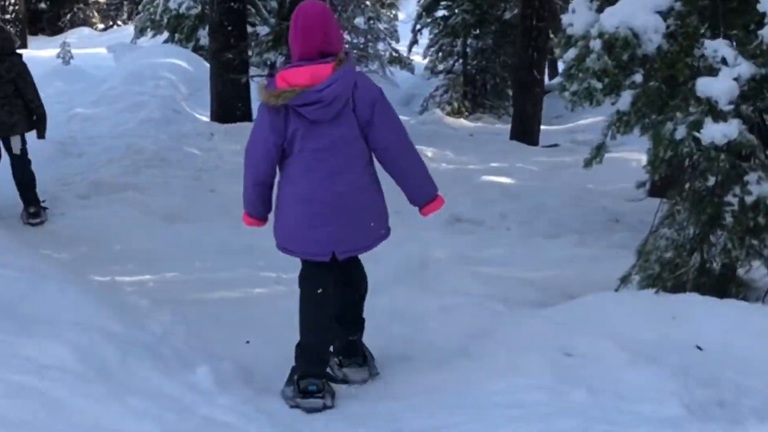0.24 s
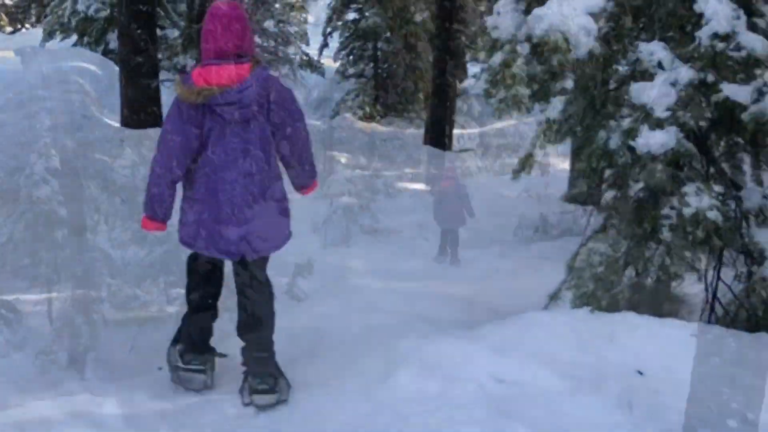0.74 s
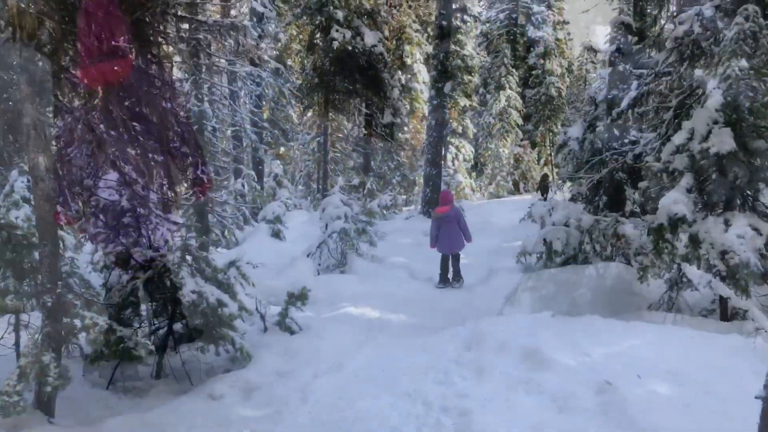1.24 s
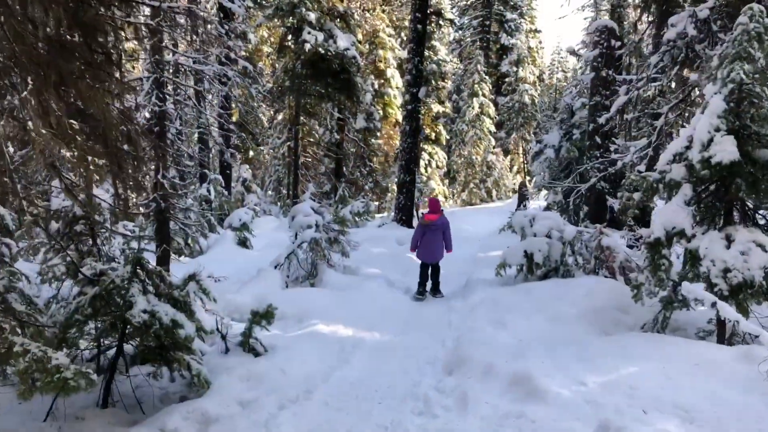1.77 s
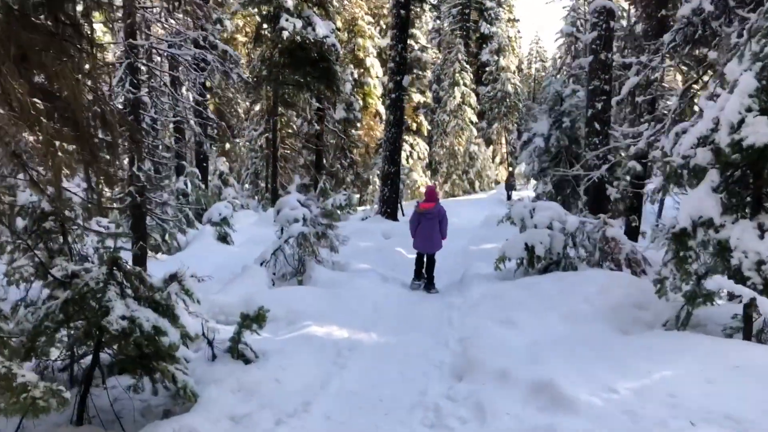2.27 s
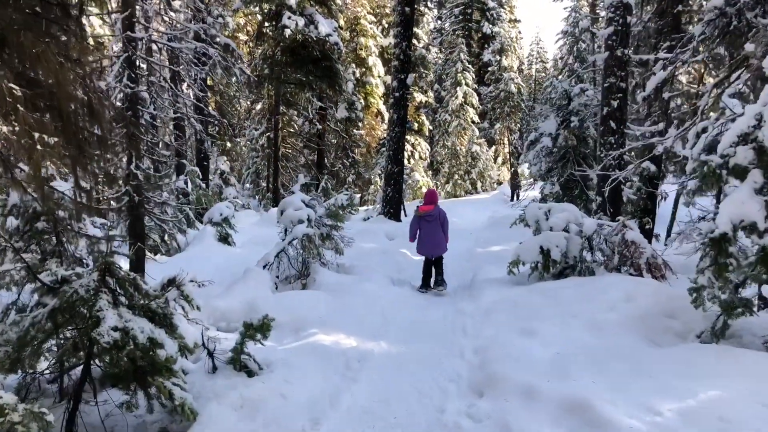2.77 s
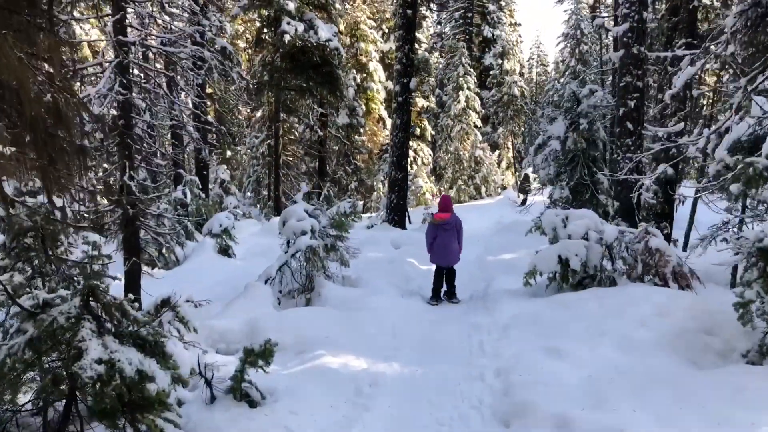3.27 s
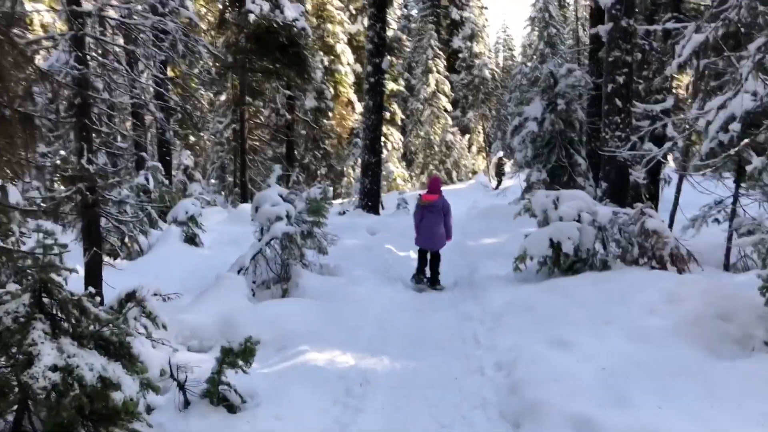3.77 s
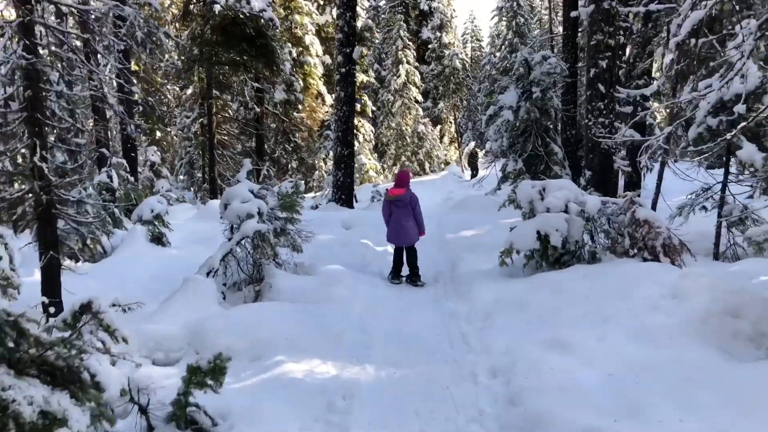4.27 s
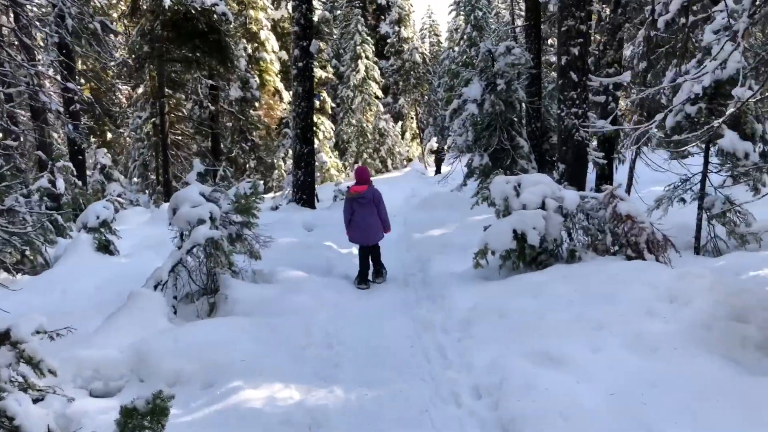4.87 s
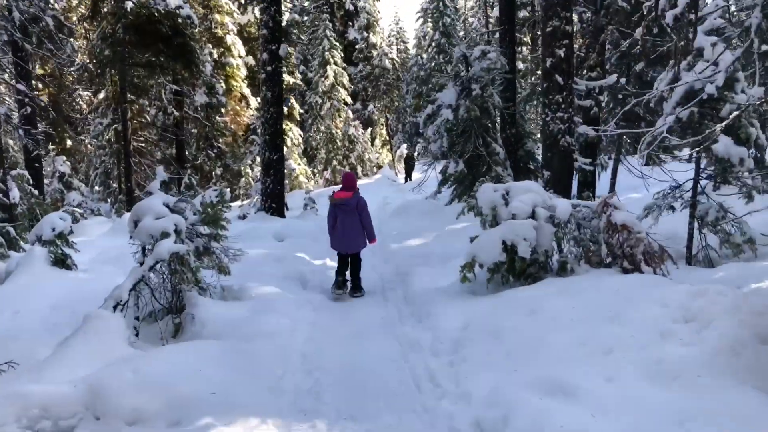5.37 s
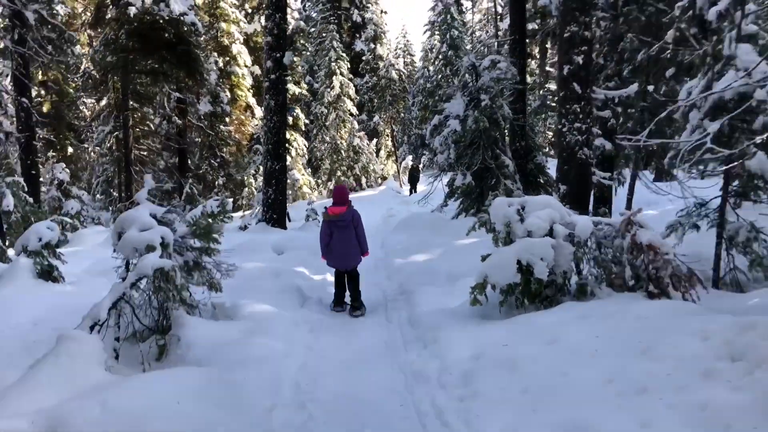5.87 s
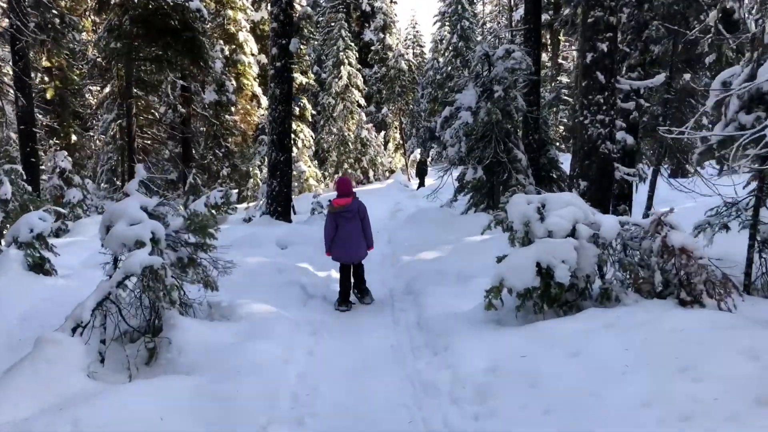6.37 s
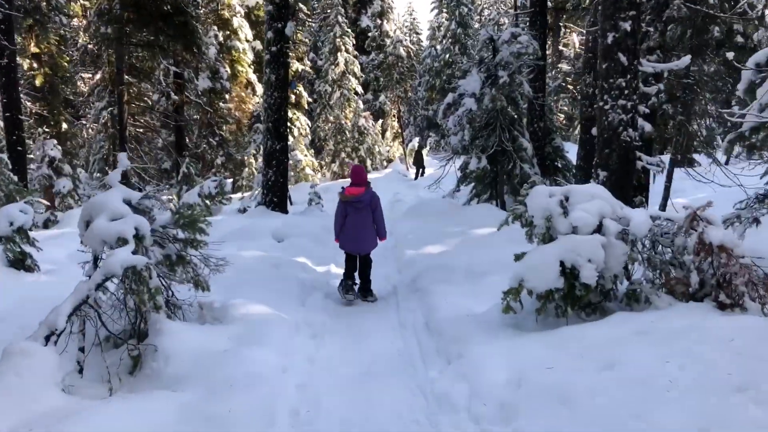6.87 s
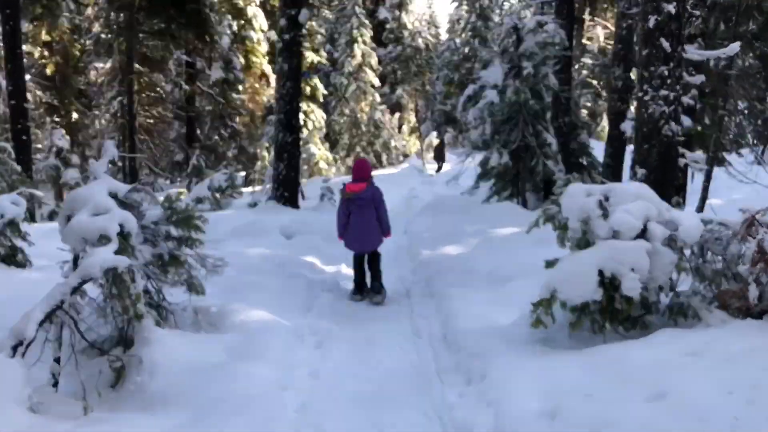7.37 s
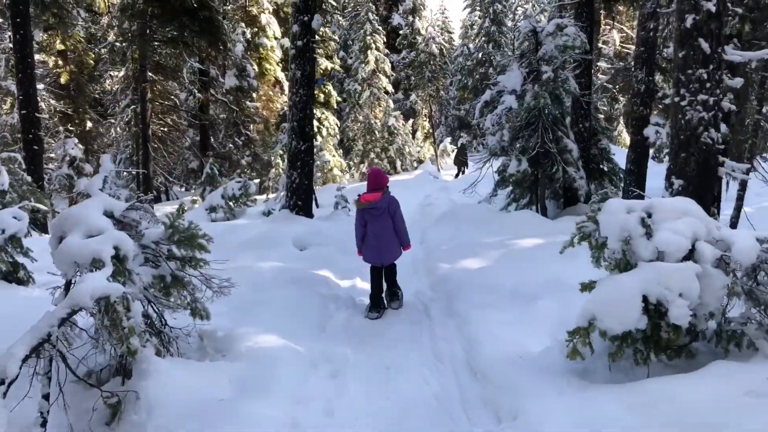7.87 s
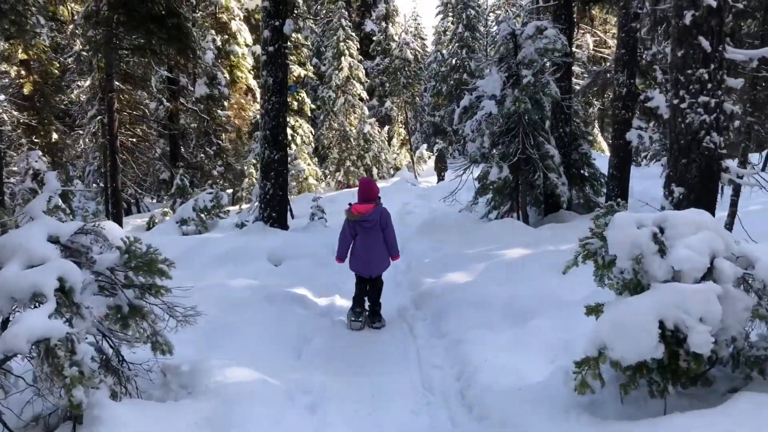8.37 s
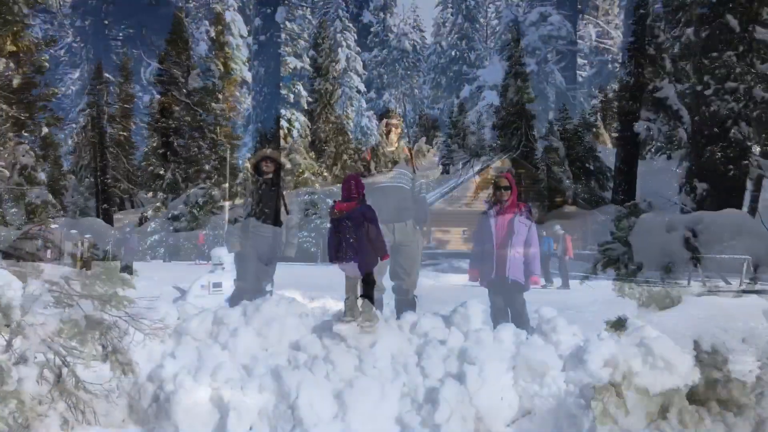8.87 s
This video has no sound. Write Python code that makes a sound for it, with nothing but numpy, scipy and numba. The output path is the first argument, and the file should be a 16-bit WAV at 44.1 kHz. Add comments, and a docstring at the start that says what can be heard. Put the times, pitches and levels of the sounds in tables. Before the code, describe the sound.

A quiet snowy forest with a soft, dull hush of air. At 0-0.3 s powder snow hisses and a light scrape and a bright crust tick sound, with jacket rustle fairly near. The first crunch comes at 0.35 s, then steps at about 1.2, 1.9, 2.6, 3.4, 4.1, 4.9, 5.6, 6.4, 7.1, 7.8 and 8.5 s. Each is a grainy, creaking crunch under load, followed some 0.15 s later by a usually deeper, rounder crunch as the foot rolls, then soft settling. Between them the frame scuffs and cleats tap with tiny hollow knocks. Sharper crust snaps stand out near 2.9, 3.9, 5.1 and 6.5 s. Steps are fullest from 2.6 to 6.5 s and lighter toward the end; rustle recedes after 1.5 s. After 8.7 s only small scuffs and hush remain. Close, dry mono pickup at chest height, with faint short tree reflections.

```python
"""First a hiss of loose snow and a light scrape, then a walker in snowshoes on packed snow, a quiet forest trail.
The microphone is at chest height. Each step is a short scuff of the frame, a long crunch as the weight
comes on, and a deeper one as the foot rolls. The crust snaps now and then; the trees return a faint tail.
Snow and crust are runs of tiny shaped clicks under force envelopes; snaps, knocks and deck are decaying sines.
Cloth is a dense run of such clicks, the still air is coloured noise, and the echoes are sparse random taps."""
import sys
import numpy as np
from scipy import signal
from scipy.fft import rfft, irfft, next_fast_len
from scipy.io import wavfile
from scipy.ndimage import uniform_filter1d
from numba import njit

SR = 44100
rng = np.random.default_rng(int(sys.argv[2]) if len(sys.argv) > 2 else 0)


def int16_out(signal):
    """Quantize to a 16-bit WAV file."""
    q = np.round(np.clip(np.atleast_2d(signal).T, -1, 1) * 32767)
    wavfile.write(sys.argv[1], SR, q.astype(np.int16))


N = 403074
TIME = np.arange(N) / SR
THUD_HZ, FIZZ_HZ = 550, 3100  # the crunch lies between these, the thud below, the fizz above
EDGE_HZ = 16300  # upper band limit of the recorder


def gain_of(db):
    """Decibels to an amplitude factor."""
    return 10 ** (np.asarray(db) / 20)


def evened(x):
    """Scales to rms 1."""
    return x / np.sqrt(np.mean(x ** 2) + 1e-20)


def read(points, hz):
    """Joins (f/Hz, value) points on a log-frequency axis."""
    f, value = np.transpose(points)
    return np.interp(np.log(hz + 1), np.log(f + 1), value)


def add(mix, s, sound):
    """Mixes a sound in at time s, in seconds."""
    part = mix[max(round(s * SR), 0):][:len(sound)]
    part += sound[:len(part)]


def swell(t, hold, rise, fall):
    """Grows exponentially towards time zero, holds, and dies away; all times in seconds."""
    return np.exp(np.minimum(t, 0) / rise - np.maximum(t - hold, 0) / fall)


def click(colour, lumps_db, size=1024, count=36):
    """One fracture: a causal (minimum-phase) click of the given colour with chance resonances of its own."""
    hz = abs(np.fft.fftfreq(size, 1 / SR))
    lump_hz = np.linspace(np.sqrt(60), np.sqrt(EDGE_HZ), count) ** 2
    lumps = np.c_[lump_hz, rng.standard_normal(count)]
    log_gain = np.log(gain_of(read(colour, hz) + lumps_db * read(lumps, hz)))
    return np.fft.ifft(np.exp(np.conj(signal.hilbert(log_gain)))).real


@njit
def strew(at, sizes, kinds, shapes, length):
    """Lays one click of the given kind and size at each place."""
    out = np.zeros(length + shapes.shape[1])
    for i in range(len(at)):
        for j in range(shapes.shape[1]):
            out[at[i] + j] += sizes[i] * shapes[kinds[i], j]
    return out[:length]


def grains(colour, per_s, spread_db, lumps_db, count=40):
    """A run of fractures at chance moments, most of them tiny and a few large."""
    at = np.flatnonzero(rng.random(N) < per_s / SR)
    size_db = spread_db * np.minimum(rng.exponential(1, N)[at], 4)
    sizes = gain_of(size_db) * rng.choice([-1, 1], N)[at]
    shapes = np.array([click(colour, lumps_db) for _ in range(count)])
    return strew(at, sizes, rng.integers(0, count, N)[at], shapes, N)


def wander(x, patchy_db, size=512, order=6):
    """Snow breaks in clumps: each has its own resonances, which last about two hundredths of a second."""
    overlap = size * 3 // 4
    z = signal.stft(x, nperseg=size, noverlap=overlap)[2]
    over_time = uniform_filter1d(rng.standard_normal(z.shape), order, 1)
    patches = evened(uniform_filter1d(over_time, order // 2, 0))
    return signal.istft(z * gain_of(patchy_db * patches), nperseg=size, noverlap=overlap)[1][:N]


def registers(x, steady_s, ticks, powder=0.51):
    """Crunch, thud and fizz of a run of fractures; the foot feeds each with steady power over steady_s."""
    window = signal.windows.hann(int(2 * steady_s * SR) + 1)
    window = window / window.sum()

    def band(low_hz, high_hz):
        """One register of the fractures."""
        sos = signal.butter(4, (low_hz, high_hz), "bandpass", fs=SR, output="sos")
        return signal.sosfilt(sos, x)

    def steadied(b):
        """Divides out the slow changes of power."""
        return b / np.sqrt(abs(signal.oaconvolve(b ** 2, window, "same")) + 1e-14)

    crunch, thud, fizz = band(THUD_HZ, FIZZ_HZ), band(55, THUD_HZ), band(FIZZ_HZ, 19000)
    # countless tiny crystals rub between the fractures and fill in the fizz: same spectrum, random phase
    spectrum = rfft(fizz, 2 * next_fast_len(N // 2 + 1))
    turned = spectrum * np.exp(2j * np.pi * rng.random(len(spectrum)))
    fizz = fizz + powder * irfft(turned)[:N]
    # a few hard ice crystals tick out above the rest, each with its own ring
    ice = grains([(1500, -48), (3900, 18.0), (16000, -25)], per_s=90, spread_db=5.0, lumps_db=5.5)
    return steadied(crunch), steadied(thud), evened(steadied(fizz) + ticks * evened(ice))


# colour of the still forest air: f/Hz, level/dB [per Hz, relative]
FOREST_AIR = [(25, -30), (60, 1.5), (160, 6.5), (500, 2.5), (1900, -10.5), (4000, -12), (8000, -16.5),
              (16000, -27)]


def air(air_db=-57):
    """A soft, dull hush: random noise weighted by the colour of the air."""
    colour = gain_of(read(FOREST_AIR, np.fft.rfftfreq(N, 1 / SR)))
    return gain_of(air_db) * evened(irfft(rfft(rng.standard_normal(N)) * colour, N))


def scatter(x, t60s, delay):
    """Sparse echoes after a delay/s, each band dying at its own speed; t60s lists f/Hz, t60/s."""
    taps = rng.standard_normal(SR) * (rng.random(SR) < 2500 / SR)
    hz, t, z = signal.stft(taps, SR, nperseg=256)
    decay = gain_of(-60 * t / read(t60s, hz)[:, None])
    tail = signal.istft(z * decay, SR, nperseg=256)[1]
    return signal.oaconvolve(x, np.r_[np.zeros(int(delay * SR)), tail / np.linalg.norm(tail)])[:N]


# clothes and loose snow, louder at first while the walker is near: t/s, level/dB [before the leg swing]
RUSTLE_LEVEL = [(0, -50), (0.4, -51), (1.15, -49), (1.6, -56), (5.0, -59.5), (8.7, -58), (9.1, -64)]
# colour of cloth and powder: f/Hz, level/dB [per Hz, relative]
CLOTH_COLOUR = [(100, 9), (900, 7.5), (2700, 4.5), (4200, 2), (7000, -0.5), (16000, -8.5)]
# moments between strides when the clothes hang still: t/s, length/s
STILL_MOMENTS = [(0.682, 0.031), (1.684, 0.11), (2.29, 0.084), (3.17, 0.046), (3.273, 0.044),
                 (3.744, 0.048), (5.35, 0.13), (6.025, 0.18), (6.759, 0.083), (8.226, 0.05), (8.88, 0.1)]
PAUSE_DB, PAUSE_EDGE_S = -16, 0.015
SWING_LEAD_S, SWING_RISE_S, SWING_FALL_S, SWING_REST_DB = 0.16, 0.032, 0.33, -8


def rustle(rustle_db=0, crumbs_db=-4):
    """Cloth and powder hiss from the swing of the leg until the foot rolls, and stray crumbs drop off the decks."""
    swing = np.max([swell(TIME - s + SWING_LEAD_S, SWING_LEAD_S + delay, SWING_RISE_S, SWING_FALL_S)
                    for s, _, _, _, delay, *_ in FOOTFALLS], axis=0)
    still = np.max([swell(TIME - s, length, PAUSE_EDGE_S, PAUSE_EDGE_S)
                    for s, length in STILL_MOMENTS], axis=0)
    level_db = np.interp(TIME, *np.transpose(RUSTLE_LEVEL)) + PAUSE_DB * still
    level = gain_of(level_db) * (swing + gain_of(SWING_REST_DB))
    hiss = evened(grains(CLOTH_COLOUR, per_s=2500, spread_db=1.5, lumps_db=2.0))
    crumbs = evened(grains(CLOTH_COLOUR, per_s=45, spread_db=2.5, lumps_db=5))
    return level * (gain_of(rustle_db) * hiss + gain_of(crumbs_db) * crumbs)


# ring of the snowshoe deck: f/Hz, level/dB [before ring_db], t60/s
DECK_MODES = [(565.6, -29.5, 0.11), (822, -23, 0.065), (1040, -28, 0.024)]


def deck(x, ring_db=-23):
    """The stiff deck rings briefly with whatever strikes it: decaying sines convolved with the blows."""
    t = np.arange(SR // 5) / SR
    ring = sum(gain_of(db + ring_db - 60 * t / t60) * np.sin(2 * np.pi * hz * t)
               for hz, db, t60 in DECK_MODES)
    return signal.oaconvolve(x, ring)[:N]


# single snaps of the crust: t/s, level/dB [of the swing], pitch f/Hz [nominal, sinks], grit level/dB [re swing]
CRUST_SNAPS = [(0.2923, -8.5, 4870, -25), (1.326, -25, 444, -7), (2.0597, -24, 674, -23),
               (2.8109, -9, 820, -17), (2.828, -16, 1430, -5), (2.9267, -5.5, 2633, -9.5),
               (3.8966, -10.5, 940, -13.5), (4.0706, -13.5, 920, -17), (5.0578, -5.5, 2030, -15),
               (5.1608, -7, 1700, -22), (5.7428, -10, 1250, -22), (5.7526, -10.5, 1210, -25),
               (6.53, -1.0, 1174, -38), (7.2104, -22, 1060, 2), (8.6411, -16.5, 850, -16.5)]


def snaps(cycles=0.68, sink=0.092, grit_s=0.0023, snap_db=0, settle_db=-10.0, settle_ratio=0.51):
    """A piece of crust breaks: a few cycles that sink in pitch, a lower swing as it settles, a rattle of crumbs."""
    out, t = np.zeros(N), np.arange(SR // 30) / SR
    crumbs = evened(grains(SURFACE_COLOUR, per_s=5100, spread_db=3.5, lumps_db=3.5))

    def swing(hz):
        """Small pieces ring higher and stop sooner."""
        age = hz * t / cycles
        turns = (1 + 2 * sink) * np.log1p(sink * hz * t) / sink
        return age * np.exp(1 - age) * np.sin(2 * np.pi * turns)

    for s, level, hz, grit_db in CRUST_SNAPS:
        grit = gain_of(grit_db) * crumbs[int(s * SR):][:len(t)] * np.exp(-t / grit_s)
        add(out, s, gain_of(level + snap_db) * (swing(hz) + grit))
        add(out, s + 2 / hz, gain_of(level + settle_db) * swing(settle_ratio * hz))
    return signal.sosfilt(signal.butter(2, 220, "highpass", fs=SR, output="sos"), out)


# the cleats tap the crust: t/s, level/dB, icy fizz level/dB [all before the trims], knock f/Hz [at its start]
CLEAT_TAPS = [(0.348, -21.5, -33, 1520), (1.161, -14.5, -30, 1220), (2.022, -15, -50, 1250),
              (2.444, -17.5, -41.5, 1060), (2.54, -21, -40.5, 1210), (3.391, -23, -36, 1120),
              (4.006, -22, -44.5, 1120), (4.507, -18.5, -43.5, 826), (4.795, -18.5, -36.5, 2600),
              (5.025, -14, -35, 1020), (5.09, -14.5, -36, 1700), (5.807, -17, -35, 770),
              (6.153, -17, -42, 960), (6.584, -22, -39.5, 650), (7.5, -20, -66, 840),
              (7.787, -21, -39.5, 1130), (7.808, -15.5, -44, 1800), (8.314, -18, -49, 980),
              (8.404, -20.5, -42, 1220), (9.073, -26.5, -43, 1500)]
KNOCK_DB, KNOCK_S, KNOCK_SAG_PER_S = -9, 0.0015, 10.2


def knocks(lag=0.00211):
    """The tapped crust answers with a brief hollow note that sags in pitch."""
    out, t = np.zeros(N), np.arange(SR // 25) / SR
    shape = t / KNOCK_S * np.exp(1 - t / KNOCK_S)
    for s, level, _, hz in CLEAT_TAPS:
        turns = np.cumsum(hz * np.exp(-KNOCK_SAG_PER_S * t)) / SR
        add(out, s + lag, gain_of(level + KNOCK_DB) * shape * np.sin(2 * np.pi * turns))
    return out


def touch(t, length, decay, droop=0.64, soft=0.26, rise_s=0.0017):
    """Force of a contact: short ones start abruptly, long ones swell in; the hold sags, then grains settle."""
    rise = np.clip(t / (rise_s + soft * length), 0, 1) ** 1.5
    sag = droop * (.5 - np.clip(t / length, 0, 1))
    return rise * np.exp(sag - np.maximum(t - length, 0) / decay)


# the frame scuffs the snow; a few rows are low bodies of crust snaps or a tap; levels before the trims:
# t/s, length/s, crunch level/dB, low thud level/dB [re crunch]
FRAME_SCUFFS = [(0.078, 0.027, -40, -12), (0.15, 0.011, -44, 6), (0.567, 0.023, -40.5, -13),
                (0.81, 0.02, -43.5, -27), (1.02, 0.034, -32.5, -8), (1.063, 0.043, -37, -17),
                (1.12, 0.013, -25.5, -17), (1.404, 0.022, -33, -4), (1.619, 0.026, -41.5, -2),
                (1.813, 0.017, -26.5, -6), (1.843, 0.04, -33.5, -17), (2.105, 0.022, -30, -3),
                (2.456, 0.032, -35, -0.5), (2.581, 0.02, -22.5, -15.5), (2.768, 0.0071, -41, 7),
                (2.921, 0.012, -23.5, -5.5), (3.109, 0.038, -37.5, -8.5), (3.229, 0.027, -37, -11.5),
                (3.351, 0.022, -32.5, -14), (3.891, 0.016, -34.5, 9.5), (3.905, 0.017, -23.5, -4.5),
                (4.06, 0.014, -22, -11.5), (4.725, 0.025, -32, -14), (4.845, 0.028, -30, -12),
                (5.155, 0.01, -25.5, -7), (5.44, 0.011, -27.5, -11.5), (5.453, 0.034, -42, -11),
                (5.569, 0.028, -29.5, -13), (5.964, 0.02, -39, -7), (6.151, 0.01, -33, -10.5),
                (6.296, 0.02, -30, -10), (6.319, 0.0029, -27.5, -22), (6.852, 0.022, -33, -9),
                (7.031, 0.013, -28, -14), (7.229, 0.017, -46, 5), (7.339, 0.016, -33, -7.5),
                (7.608, 0.06, -37, -10), (7.721, 0.063, -39.5, -20), (8.04, 0.021, -34.5, -12),
                (8.291, 0.016, -33, -4), (8.446, 0.013, -27, -15.5), (8.732, 0.01, -39, -25),
                (8.852, 0.016, -44, -19), (8.951, 0.037, -52, -11), (9.015, 0.007, -34.5, 4),
                (9.116, 0.0092, -40.5, -23)]
# icy powder kicked off the deck: t/s, length/s, level/dB [of the fizz, before the trim]
POWDER_SPRAYS = [(0.011, 0.0059, -46.5), (0.202, 0.018, -37), (0.247, 0.003, -41), (0.261, 0.0085, -33.5),
                 (0.285, 0.036, -27.5), (0.349, 0.0038, -36), (0.42, 0.014, -37), (0.569, 0.017, -41),
                 (0.63, 0.036, -55), (0.738, 0.016, -41), (0.805, 0.021, -44.5), (0.861, 0.0079, -37),
                 (0.931, 0.045, -43), (1.516, 0.041, -48.5), (2.209, 0.0066, -43.5), (2.258, 0.016, -47.5),
                 (3.004, 0.016, -36.5), (3.658, 0.0037, -40), (4.646, 0.028, -52), (6.112, 0.0064, -43.5),
                 (6.176, 0.014, -47.5), (6.229, 0.021, -47), (6.274, 0.02, -53), (6.73, 0.018, -51),
                 (6.93, 0.012, -44.5), (7.483, 0.033, -51), (7.566, 0.022, -44.5), (7.718, 0.029, -45.5),
                 (8.186, 0.011, -51), (8.351, 0.0048, -38.5)]
# colour of snow breaking under a light touch: f/Hz, level/dB [per Hz, relative]
SURFACE_COLOUR = [(24, -87), (40, -37.5), (237, -3), (312, -14.5), (433, -4.5), (1020, 1), (1410, -2),
                  (2380, -6.5), (3380, -14), (5440, -10.5), (16000, -24)]
# the icy fizz follows the touch, slightly brighter when the touch is harder
TOUCH_DB, TOUCH_FIZZ_DB, FIZZ_DB_PER_DB = -36, -11, 0.13
TAP_S, TAP_CRUNCH_DB, TAP_THUD_DB, TAP_FIZZ_DB = 0.0063, -10, -23.5, -3
SPRAY_CRUNCH_DB, SPRAY_THUD_DB = -5.5, -11


def scuffs(crunch_db=-1.5, thud_db=-1, fizz_db=1, thud_lag=0.0055, crunch_s=0.0047, thud_s=0.012, fizz_s=0.006):
    """Frame, cleats and kicked powder break the surface; the thud comes late and lingers longest."""
    surface = wander(grains(SURFACE_COLOUR, per_s=1800, spread_db=2.5, lumps_db=4.5), patchy_db=6)
    crunch, thud, fizz = registers(surface, steady_s=0.0074, ticks=0.4)
    crunch_force, thud_force, fizz_force = np.zeros((3, N))
    t = np.arange(SR // 5) / SR
    # contacts: t/s, length/s, then crunch, thud and fizz level/dB
    contacts = [(s, length, level, level + low, level + TOUCH_FIZZ_DB + FIZZ_DB_PER_DB * (level - TOUCH_DB))
                for s, length, level, low in FRAME_SCUFFS]
    contacts += [(s, TAP_S, level + TAP_CRUNCH_DB, level + TAP_THUD_DB, high + TAP_FIZZ_DB)
                 for s, level, high, _ in CLEAT_TAPS]
    contacts += [(s, length, level + SPRAY_CRUNCH_DB, level + SPRAY_THUD_DB, level)
                 for s, length, level in POWDER_SPRAYS]
    for s, length, middle, low, high in contacts:
        fizz_touch = touch(t, length, fizz_s, droop=0.166, soft=0.24, rise_s=0.0016)
        add(crunch_force, s, gain_of(middle + crunch_db) * touch(t, length, crunch_s))
        add(thud_force, s, gain_of(low + thud_db) * touch(t - thud_lag, length, thud_s))
        add(fizz_force, s, gain_of(high + fizz_db) * fizz_touch)
    return crunch_force * crunch + thud_force * thud + fizz_force * fizz


# the load gives way in small uneven slips, each a spurt of grains that dies quickly
SLIPS_PER_S, SLIP_S, SLIP_SHARE = 90, 0.0056, 0.38


def slips():
    """Unsteady flow of the collapse: a steady part plus spurts at chance moments."""
    starts = rng.random(N) < SLIPS_PER_S / SR
    spurts = signal.lfilter([1], [1, -np.exp(-1 / (SLIP_S * SR))], starts)
    return evened(1 - SLIP_SHARE + SLIP_SHARE * evened(spurts))


# each step loads the snow, creeps, rolls forward after a delay, and settles:
# t/s, load hold/s, load level/dB, creep level/dB, roll delay/s, roll hold/s, roll level/dB,
# settle level/dB, thud level/dB [re roll], icy fizz level/dB [re load crunch]
FOOTFALLS = [(0.34, 0.054, -33.5, -44.5, 0.15, 0.028, -30.5, -43.5, -9.5, -7.5),
             (1.169, 0.052, -32.5, -44, 0.14, 0.032, -30, -49, -4, -12.5),
             (1.908, 0.03, -29, -45.5, 0.12, 0.031, -29.5, -53, -7.5, -12),
             (2.635, 0.049, -29.5, -41, 0.18, 0.029, -26, -48, -4.5, -12.5),
             (3.422, 0.034, -28.5, -61, 0.13, 0.046, -27.5, -50.5, -4.5, -12),
             (4.117, 0.047, -27.5, -37.5, 0.16, 0.047, -25.5, -47, -8.5, -11.5),
             (4.901, 0.029, -29, -36, 0.1274, 0.048, -28, -46, -4, -12.5),
             (5.615, 0.041, -28, -38, 0.13, 0.038, -27.5, -45, -3.5, -12.5),
             (6.362, 0.039, -27.5, -40.5, 0.11, 0.054, -29, -44.5, -4.5, -12.5),
             (7.059, 0.058, -29.5, -37.5, 0.16, 0.024, -35, -47, 0, -10.5),
             (7.836, 0.06, -31.5, -35, 0.098, 0.031, -30.5, -43.5, -6, -13.5),
             (8.49, 0.042, -32, -42.5, 0.15, 0.019, -32, -51, -7, -12)]
# colour of snow breaking under load: f/Hz, level/dB [per Hz, relative]
PACKED_COLOUR = [(24, -26), (40, -24.5), (163, -7.5), (243, -3), (455, 0), (600, 1.5), (918, -3),
                 (1180, -3.5), (2000, -12.5), (2380, -15.5), (3140, -24), (3740, -18), (4680, -19.5),
                 (14800, -31), (16000, -46)]
# colour of a larger crystal cracking: f/Hz, level/dB [per Hz, relative]
CRACK_COLOUR = [(100, -24), (600, -1.5), (1400, 1), (2500, -1.5), (4500, -9.5), (16000, -24.5)]
# hollow is the share of the crunch force that goes to the creak
LOAD_RISE_S, LOAD_FALL_S, LOAD_THUD_DB, LOAD_HOLLOW = 0.0097, 0.017, -13, 0.81
ROLL_RISE_S, ROLL_FALL_S, ROLL_FIZZ_DB, ROLL_HOLLOW = 0.018, 0.0064, -1.5, 0.84
# the snow keeps settling softly after the roll
SETTLE_HOLD_S, SETTLE_FALL_S, SETTLE_THUD_DB, SETTLE_FIZZ_DB = 0.078, 0.057, -3, -10.5


def crunches(crunch_db=0, thud_db=0, fizz_db=0, hollow_hz=800, cracks_db=-10):
    """Under the weight the snow collapses grain by grain, deeper as the foot rolls forward, then settles."""
    collapse = wander(grains(PACKED_COLOUR, per_s=1500, spread_db=2.0, lumps_db=5), patchy_db=3.0)
    crunch, thud, fizz = registers(collapse, steady_s=0.028, ticks=0.13)
    # most of the crunch, through load, roll and settling, is a creak with its lows cut
    highpass = signal.butter(2, hollow_hz, "highpass", fs=SR, output="sos")
    creak = evened(signal.sosfiltfilt(highpass, crunch))
    creak_force, crunch_force, thud_force, fizz_force = np.zeros((4, N))
    t = np.arange(-SR // 5, SR) / SR
    for s, hold, load_db, creep_db, delay, roll_hold, roll_db, settle_db, low_db, high_db in FOOTFALLS:
        first = gain_of(load_db) * swell(t, hold, LOAD_RISE_S, LOAD_FALL_S)
        creep = gain_of(creep_db) * swell(t, delay, LOAD_RISE_S, ROLL_FALL_S)
        load = np.maximum(first, creep)
        roll = gain_of(roll_db) * swell(t - delay, roll_hold, ROLL_RISE_S, ROLL_FALL_S)
        settle_shape = swell(t - delay - roll_hold, SETTLE_HOLD_S, ROLL_RISE_S, SETTLE_FALL_S)
        settle = gain_of(settle_db) * settle_shape
        power = np.array([load, roll, settle]) ** 2
        level = np.sqrt(power.sum(0))
        hollow = np.array([LOAD_HOLLOW, ROLL_HOLLOW, ROLL_HOLLOW]) @ power / power.sum(0)
        thud_gain = gain_of([LOAD_THUD_DB, low_db, SETTLE_THUD_DB])
        fizz_gain = gain_of([high_db, high_db + ROLL_FIZZ_DB, SETTLE_FIZZ_DB])
        add(creak_force, s + t[0], level * hollow)
        add(crunch_force, s + t[0], level * (1 - hollow))
        add(thud_force, s + t[0], np.sqrt(thud_gain ** 2 @ power))
        add(fizz_force, s + t[0], np.sqrt(fizz_gain ** 2 @ power))
    body = gain_of(crunch_db) * (creak_force * creak + crunch_force * crunch)
    body += gain_of(thud_db) * thud_force * thud
    body += gain_of(fizz_db) * fizz_force * fizz
    # now and then a larger crystal cracks sharply, as loud as the load allows
    large = evened(grains(CRACK_COLOUR, per_s=110, spread_db=1.0, lumps_db=4.5))
    cracks = gain_of(cracks_db) * (creak_force + crunch_force) * large
    return cracks + slips() * body


def scene(snap_ring_db=-7):
    """Feet on snow, the short after-sound of the snowpack, its low and high ends lingering, and the trees around."""
    blows, cracks = scuffs() + knocks(), snaps()
    feet = crunches() + blows + deck(blows)
    shaken = feet + gain_of(snap_ring_db) * cracks
    snowpack_t60 = [(150, 0.3), (500, 0.13), (1200, 0.037), (8000, 0.36)]  # f/Hz, t60/s
    trees_t60 = [(200, 0.164), (1500, 0.079), (10000, 0.24)]  # f/Hz, t60/s
    snowpack = gain_of(-11) * scatter(shaken, snowpack_t60, delay=0.0027)
    trees = gain_of(-21) * scatter(feet + cracks, trees_t60, delay=0.021)
    return (feet + cracks + snowpack + trees + rustle() + air())[None]


def record(dry, dip_hz=3200, dip_q=3.3, dip=0.16):
    """The microphone has a dip in the upper mids and a low cut; then the recorder's band limit."""
    coloured = dry - dip * signal.lfilter(*signal.iirpeak(dip_hz, dip_q, fs=SR), dry)
    coloured = signal.sosfilt(signal.butter(3, 45, "highpass", fs=SR, output="sos"), coloured)
    band_limit = signal.firwin(401, EDGE_HZ, window=("kaiser", 9), fs=SR)[None]
    return signal.oaconvolve(coloured, band_limit, "same", axes=1)


dry = scene()
out = record(dry)
int16_out(out)
```